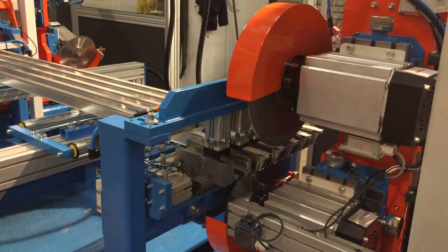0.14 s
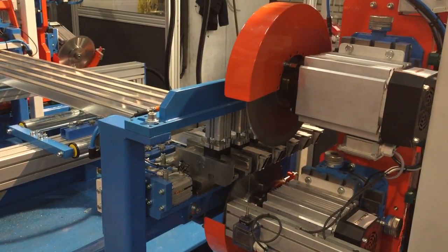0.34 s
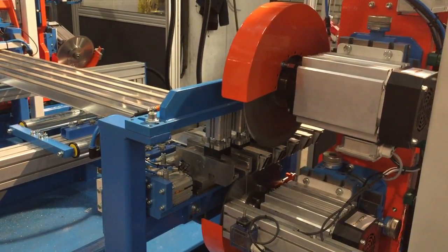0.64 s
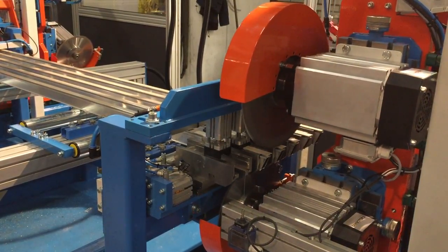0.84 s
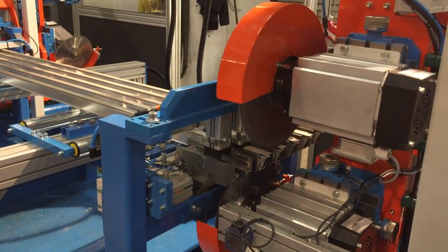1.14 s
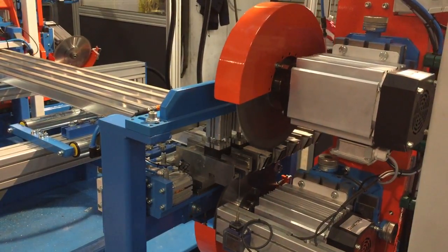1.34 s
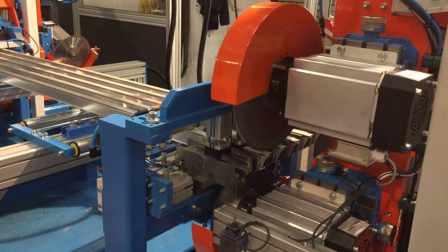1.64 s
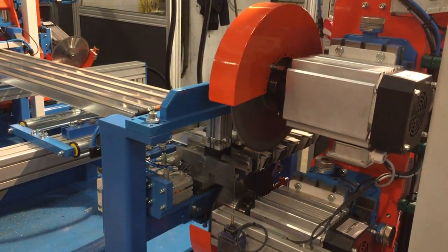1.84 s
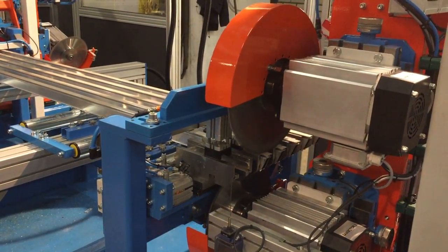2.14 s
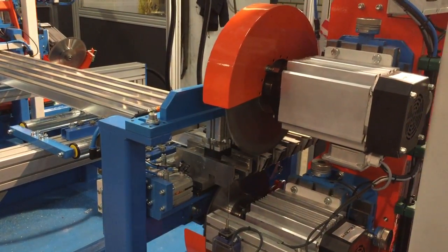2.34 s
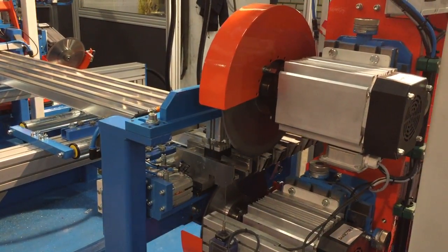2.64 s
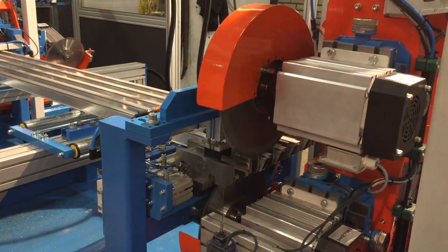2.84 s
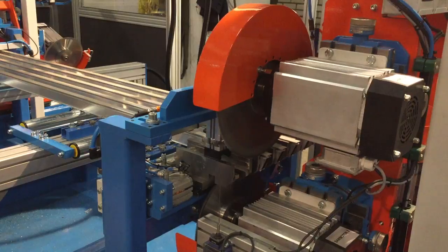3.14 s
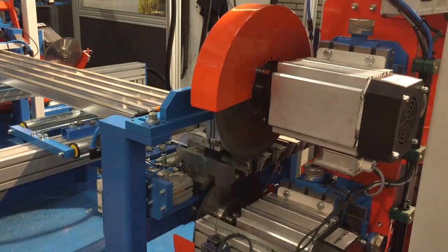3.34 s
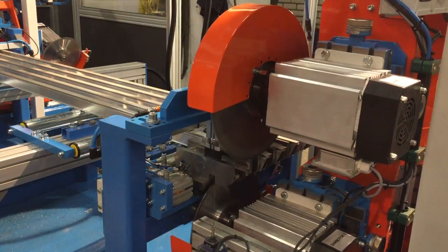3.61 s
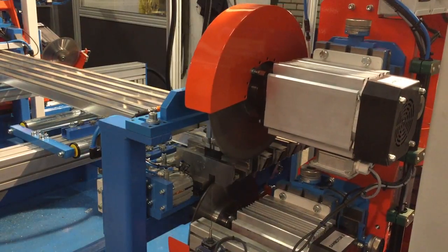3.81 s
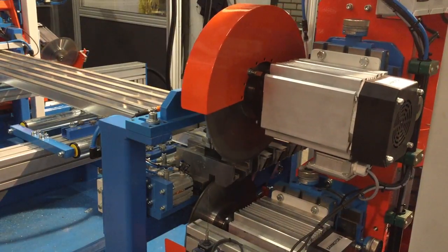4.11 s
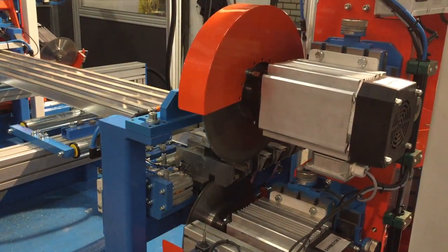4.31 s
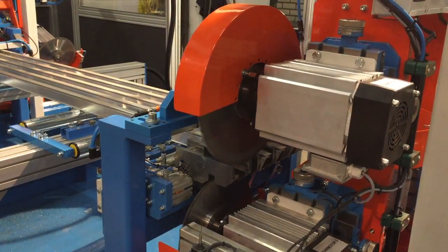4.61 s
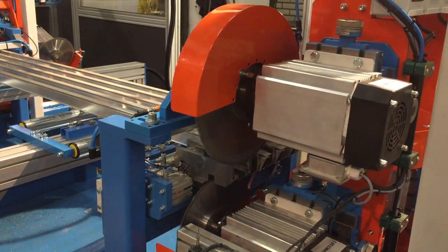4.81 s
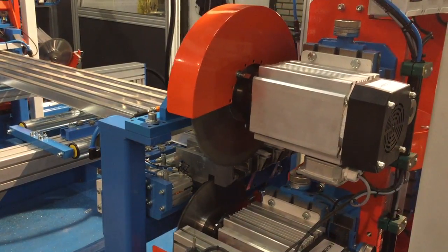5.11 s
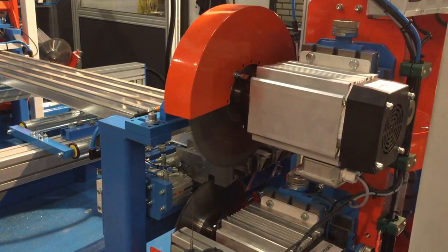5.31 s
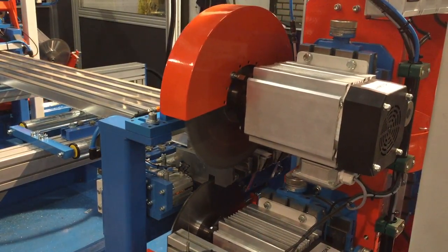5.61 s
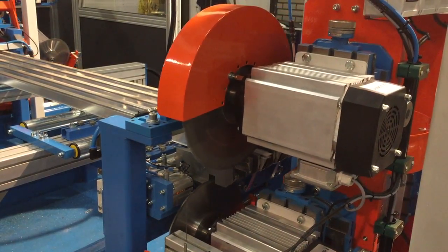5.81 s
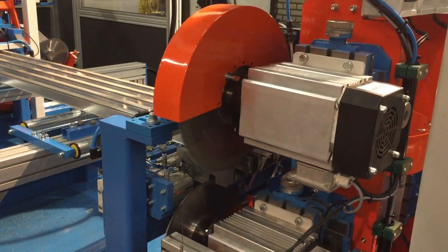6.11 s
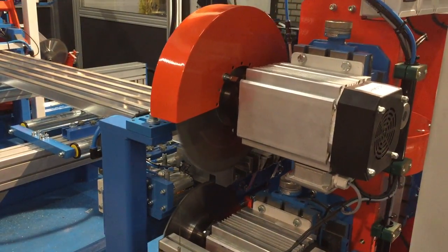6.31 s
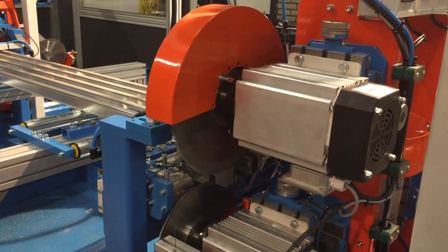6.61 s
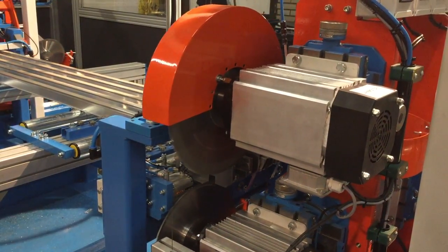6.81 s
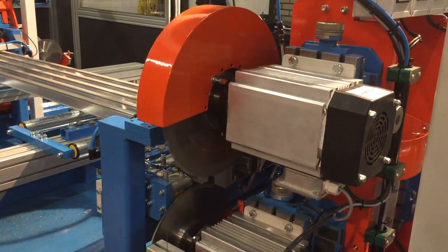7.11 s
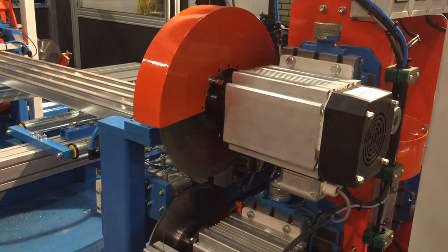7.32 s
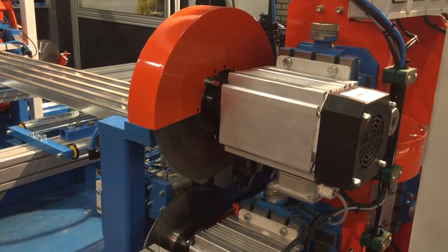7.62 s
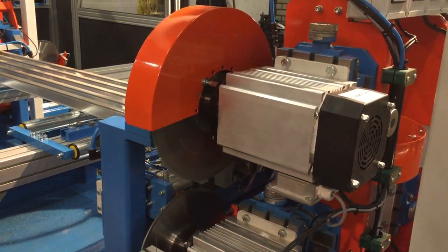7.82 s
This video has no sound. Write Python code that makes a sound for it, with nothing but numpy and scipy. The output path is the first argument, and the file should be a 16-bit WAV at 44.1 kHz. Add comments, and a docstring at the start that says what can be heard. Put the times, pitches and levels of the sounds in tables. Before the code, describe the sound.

From the start, a circular saw rasps harshly through an aluminium profile in a factory, with a high singing tone from its teeth. The blade rings in piercing swells between about 0.4 and 1.7 seconds, with a sharp squeal near 1.2 seconds. The rasp grows again around 2 seconds while the tone weakens into a fluttering buzz. At about 2.9 seconds a second cut begins, with a few small crunches of trapped chips and a thin, building hiss of spray. It rises to a rough, chattering screech around 4 seconds and ends at 4.3. Near 4.5 seconds the loose metal end rattles against the blade in a quick run of ringing strikes. From about 5 to 8 seconds the quieter machine carries on steadily, with rushing air, motor hum, a thin high whine and a low fan drone.

```python
"""A factory: a circular milling saw, 108 teeth at about 50 turns/s, cuts an aluminium profile.
The teeth sing at their passing rate and rasp through the ringing metal, with brief squeals and squeaks.
Thin walls chatter; chips spray and crunch; the loose end rattles against the blade. Underneath,
a fan drones; motor hum and air rush dip under the loud saw and come back up afterwards."""
import sys
import numpy as np
from scipy import signal
from scipy.fft import rfft, irfft, next_fast_len
from scipy.io import wavfile
from scipy.ndimage import map_coordinates

SR = 44100
rng = np.random.default_rng(int(sys.argv[2]) if len(sys.argv) > 2 else 0)


def store_pcm(level_fs):
    """Save levels as 16-bit WAV."""
    pcm = np.round(np.clip(level_fs, -1, 1) * 32767).astype(np.int16)
    wavfile.write(sys.argv[1], SR, np.atleast_2d(pcm).T)


N = 350595
T = np.arange(N) / SR

TEETH, TOP_HZ = 108, 15750
SECOND_CUT_S, ENTRY_S, EXIT_S = 2.93, 0.015, 0.034

# tooth-passing rate, sagging under load (time [s], rate [Hz])
TOOTH_RATE = [(.37, 5388), (.48, 5366), (.68, 5371), (.82, 5360), (1.3, 5367), (1.5, 5380), (1.65, 5378),
              (1.7, 5356), (1.78, 5387), (3.5, 5391)]
# steady tooth tone (time [s], level [dB])
SONG_LEVEL = [(0, -30), (.12, -21.5), (1.9, -19.5), (2.2, -21), (2.6, -26.5), (3.15, -31.5), (4.2, -30.5),
              (4.6, -45)]
# blade ring (time [s], peak [dB], rise [s], fall [s], multiple of tooth rate)
BLADE_SWELLS = [(.435, -8.5, .085, 0.056, 1), (.69, -15, 0.25, .1, 1), (.86, -11, .07, .19, 1),
                (1.04, -22.5, 0.064, .07, 1), (1.234, -15, 0.13, 0.15, 1), (1.55, -19, 0.19, 0.089, 1),
                (1.666, -9.5, 0.15, .048, 1), (.81, -21, .05, 0.073, 2), (1.24, -28, 0.046, 0.041, 2)]
# lines of unequal teeth (multiple of tooth rate, relative level [dB])
UNEVEN_LINES = [(1 / 2, -40), (3 / 4, -36), (3 / 2, -49), (5 / 2, -45)]
# blade in a wall (start [s], end [s], final rasp [dB], final sizzle [dB], growth [dB])
WALL_PASSES = [(0, 0.572, -21.5, -20.5, 4), (.6, 1.877, -30.5, -31, 1), (1.25, 1.263, -37, -27, 0),
               (1.57, 1.654, -32, -35, -3), (1.908, 2.481, -22, -24, 4.5), (2.57, 2.92, -26.5, -31, 6),
               (2.938, 3.005, -25.5, -27, -1), (3.058, 3.157, -22.5, -25, 1), (3.19, 3.55, -21, -21, 6.5),
               (3.59, 4.308, -20.5, -25, -0.5)]

# broad spectra (frequency [Hz], relative density [dB])
FIRST_CUT_COLOUR = [(500, -46), (1000, -10.5), (1400, -8), (2200, 2), (3000, -3), (4200, 1.5), (5000, -4),
                    (6600, -5), (8000, -5.5), (9800, 0), (12500, -7.5), (15500, -4.5)]
SECOND_CUT_COLOUR = [(500, -39), (1000, -17), (1500, 0.5), (2300, 1.5), (3000, -2.5), (4200, 4),
                     (5000, -7.5), (6200, -4), (7500, 0.5), (9500, -2), (12000, -6), (15500, -8)]
AIR_COLOUR = [(25, -43), (50, -15), (140, -9.5), (220, -11.5), (500, -10), (740, -13.5), (1350, -4.5),
              (1950, 1), (3900, -4.5), (5060, -11.5), (6450, -12.5), (9400, -16), (10400, -21),
              (11400, -18), (15700, -21)]
CRUNCH_COLOUR = [(600, -35), (1000, 6), (1600, 1.5), (3200, 10.5), (4500, -18), (9000, 3.5),
                 (15500, -23)]
OFFCUT_COLOUR = [(600, -42), (1400, -2.5), (2500, -5.5), (4200, 2.5), (5600, -2.5), (9000, -9.5),
                 (15500, -13)]
# chip hiss (offset from centre [Hz], relative density [dB])
SPRAY_SIDEBANDS = [(10, -7), (100, 4), (350, -14), (900, -12), (2000, -80)]
# resonances (frequency [Hz], width [Hz], gain over colour [dB])
FIRST_CUT_MODES = [(1460, 55, 14), (1860, 130, 5), (2680, 90, 3), (3580, 62, 7), (3970, 83, 4),
                   (7180, 150, 9), (8820, 120, 10), (14500, 500, 5)]
SECOND_CUT_MODES = [(1478, 30, 13), (1660, 150, 4), (3680, 60, 8), (6720, 100, 3), (7340, 200, 9),
                    (8770, 60, 4), (9035, 50, 12)]
CRUNCH_MODES = [(1634, 64, 22), (2260, 200, 12), (5060, 79, 31), (8800, 120, 15.5)]
OFFCUT_MODES = [(1814, 87, 30.5), (3600, 130, 17.5), (4100, 360, 6.5), (7150, 160, 15.5), (8950, 180, 21.5),
                (13900, 250, 17)]

# background machine noise, dipping under the loud saw, back up afterwards (time [s], level [dB])
BACKGROUND_LEVEL = [(.4, -26), (.55, -29.5), (1.8, -32), (2.5, -30), (3.05, -24), (3.6, -23.5), (4.65, -28),
                    (5.1, -21), (7.95, -21)]
# fan drone (time [s], level [dB])
FAN_LEVEL = [(0, -45), (1.45, -40), (2.5, -47), (3.45, -32), (4.4, -36), (5.65, -34), (6.0, -42),
             (7.95, -40)]
# motor hum and drive whine (frequency [Hz], level re background [dB])
MOTOR_LINES = [(100, -21.5), (244.4, -19.5), (668, -31.5), (898, -30)]
DRIVE_LINES = [(3779, -17.5), (4000, -17), (4221, -20), (4802, -18.5), (8000, -26.5)]

# squeals and faint high sum tones (time [s], peak [dB], rise [s], fall [s], frequency [Hz])
SQUEAL_TONES = [(.15, -28.5, 0.098, .25, 1462), (.54, -26, .015, 0.048, 7190),
                (1.15, -15, 0.077, 0.058, 2342), (1.08, -31, .04, .07, 13080), (1.17, -31, .05, .04, 7720),
                (1.22, -32, .12, 0.028, 3055), (1.6, -26.5, .14, 0.098, 1554), (2.03, -33, .12, 0.11, 1517),
                (1.84, -30.5, 0.027, .03, 1930), (1.86, -29, 0.043, .028, 3470),
                (2.492, -26, 0.053, .025, 1570), (2.98, -22, .025, 0.017, 1488),
                (3.5, -25.5, .2, .17, 9045)]
# chattering walls (time [s], peak [dB], rise [s], fall [s], frequency [Hz])
WALL_CHATTER = [(.41, -22, 0.14, .12, 1882), (2.21, -26.5, .07, 0.18, 1902), (3.95, -19, .11, 0.069, 1987),
                (4.11, -13.5, 0.067, 0.0584, 2044), (4.291, -15, .05, 0.026, 1870)]
# squeaks and the cut's sunken ring (time [s], frequency [Hz], relative level [dB], sigma [s])
SQUEAK_BANDS = [(.44, 3350, -26, .04), (.87, 9800, -39, .09), (1.02, 9450, -35, .02),
                (1.266, 6300, -32, .016), (1.265, 3900, -29, .02), (2.27, 4400, -33, .1),
                (4.07, 6700, -31, .12)]
# brief contacts (time [s], relative level [dB], length [s])
CHIP_CRUNCHES = [(3.078, -20.5, 0.0067), (3.104, -18.5, 0.011), (3.146, -21, 0.0071),
                 (3.257, -25.5, 0.0057)]
OFFCUT_STRIKES = [(4.479, -11, 0.0048), (4.493, -18, 0.0069), (4.522, -10, 0.0074), (4.533, -22, 0.0065),
                  (4.549, -16, 0.016), (4.583, -11.5, 0.0061), (4.6, -20, 0.0082)]


def amp(db):
    """Decibels to gain."""
    return 10 ** (np.asarray(db) / 20)


def unit(x):
    """Scaled to rms 1."""
    return x / np.sqrt(np.mean(x ** 2) + 1e-20)


def curve(rows):
    """(time, value) rows, interpolated per sample."""
    return np.interp(T, *np.transpose(rows))


def wobble(rate_hz):
    """Smooth random curve, knots at rate_hz."""
    return map_coordinates(rng.standard_normal(int(N * rate_hz / SR) + 4), [T * rate_hz])


def phase_of(hz):
    """Phase [rad] of a changing frequency."""
    return 2 * np.pi * np.cumsum(hz) / SR


def held(start_s, end_s, attack_s, release_s):
    """1 from start to end, with Gaussian flanks."""
    before = np.minimum(T - start_s, 0) / attack_s
    after = np.maximum(T - end_s, 0) / release_s
    return np.exp(-before ** 2 - after ** 2)


def swell(peak_s, rise_s, fall_s):
    """Asymmetric bell."""
    return np.exp(-((T - peak_s) / np.where(T < peak_s, rise_s, fall_s)) ** 2 / 2)


def lobe(peak_s, rise_s, fall_s):
    """Slightly pointed arch, zero beyond its ends."""
    u = (T - peak_s) / np.where(T < peak_s, rise_s, fall_s)
    return np.cos(np.pi / 2 * np.clip(u, -1, 1)) ** 1.18


def bursts(rows, ring_s):
    """Contact envelope: fast rise, slower fall, weak dying ring."""
    power = np.zeros(N)
    for at_s, db, length_s in rows:
        t = T - at_s
        contact = np.exp(-(np.where(t < 0, 1.3 * t, t) / length_s) ** 2)
        ring = .06 * (t > 0) * np.exp(-abs(t) / ring_s)
        power += amp(2 * db) * (contact + ring)
    return np.sqrt(power)


def filtered(x, response):
    """x through a frequency response."""
    size = next_fast_len(N + 8192)
    return irfft(rfft(x, size) * response(np.fft.rfftfreq(size, 1 / SR)), size)[:N]


def coloured(x, colour, modes=()):
    """x through a broad spectrum plus resonances, at rms 1."""
    def response(hz):
        knots_hz, db = np.transpose(colour)
        broad = amp(np.interp(np.log(hz + 1), np.log(knots_hz), db, left=-120))
        peaks = sum((amp(gain_db) - 1) * 1j * hz * width_hz
                    / (mode_hz ** 2 - hz ** 2 + 1j * hz * width_hz)
                    for mode_hz, width_hz, gain_db in modes)
        return broad * (1 + peaks)
    return unit(filtered(x, response))


def tooth_song(turn_rad):
    """Tooth-passing tone: flutters once a turn, gives way for a while to the blade's ring."""
    level_db = curve(SONG_LEVEL)
    tooth_rad = TEETH * turn_rad + 0.14 * wobble(130)
    flutter = np.interp(T, [1.8, 2.7], [0.25, 0.45])  # deeper as the blade comes free
    sidebands = np.sin(tooth_rad + turn_rad) + np.sin(tooth_rad + 2 * turn_rad) / 2
    give_way = 1 - 0.98 * held(0.405, 1.685, attack_s=0.04, release_s=0.04)
    tone = amp(level_db) * give_way * (np.sin(tooth_rad) + flutter * sidebands)
    octave_db = -13 + 0.86 * level_db + 3 * wobble(14)
    octave = amp(octave_db) * np.sin(2 * tooth_rad + .5 * wobble(45))
    ring = sum(amp(db) * lobe(at_s, rise_s, fall_s) * np.sin(order * tooth_rad)
               for at_s, db, rise_s, fall_s, order in BLADE_SWELLS)
    uneven = sum(amp(db + 4 * wobble(14)) * np.sin(order * tooth_rad) for order, db in UNEVEN_LINES)
    uneven_gain = amp(-12) + amp(3) * swell(0.79, rise_s=.06, fall_s=0.83)
    return tone + octave + ring + uneven_gain * uneven


def bites(turn_rad, runout_db, chip_db):
    """Each tooth tears a chip of random size; once a turn the blade digs in and eases off."""
    teeth = (1 + .5 * np.cos(TEETH * turn_rad)) * rng.standard_normal(N)
    dig = (np.sin(turn_rad) + np.sin(2 * turn_rad) / 2) * (1 + wobble(30))
    chip_size = unit(wobble(70) + wobble(450))
    return teeth * amp(runout_db * np.minimum(dig, 2) + chip_db * chip_size)


def profile_ring(force, ring_s, gain):
    """The hollow profile's many close modes ring on briefly."""
    t = T[:SR // 8]
    tail = rng.standard_normal(len(t)) * np.exp(-t / ring_s)
    return force + gain * signal.fftconvolve(force, tail / np.linalg.norm(tail))[:N]


def cut(force, passes, colour, modes):
    """Bites ring the profile, wall by wall: the walls rasp, the cutting edge sizzles."""
    metal = coloured(profile_ring(force, ring_s=.016, gain=.75), colour, modes)
    lows = filtered(metal, lambda hz: 1 / (1 + (hz / 5600) ** 8))
    rasp_gain, sizzle_gain = np.zeros(N), np.zeros(N)
    for start_s, end_s, rasp_db, sizzle_db, growth_db in passes:
        growth = amp(np.interp(T, [start_s, end_s], [-growth_db, 0]))
        depth = held(start_s, end_s, ENTRY_S, EXIT_S) * growth
        rasp_gain = np.hypot(rasp_gain, amp(rasp_db) * depth)
        sizzle_gain = np.hypot(sizzle_gain, amp(sizzle_db) * depth)
    return rasp_gain * unit(lows) + sizzle_gain * unit(metal - lows)


def machine(turn_rad):
    """Air rushes round the blade; motors hum, their drive whines, the cooling fan drones."""
    rush = amp(0.4 * wobble(12)) * coloured(rng.standard_normal(N), AIR_COLOUR)
    hum = sum(amp(db + 1.5 * wobble(5)) * np.sin(2 * np.pi * hz * T + .3 * wobble(7))
              for hz, db in MOTOR_LINES + DRIVE_LINES)
    fan = amp(curve(FAN_LEVEL) + 1.3 * wobble(8)) * np.sin(9 * turn_rad)
    return amp(curve(BACKGROUND_LEVEL)) * (rush + hum) + fan


def squeals(pitch_sag=0.011, jitter_hz=9):
    """Brief unsteady squeals, sharper when loud, with faint high sum tones of squeal and tooth tone."""
    out = np.zeros(N)
    for at_s, db, rise_s, fall_s, hz in SQUEAL_TONES:
        effort = swell(at_s, rise_s, fall_s)
        phase = phase_of(hz * (1 - pitch_sag * (1 - effort)) + jitter_hz * wobble(130))
        overtone = amp(-26) * (2 * hz < TOP_HZ) * np.sin(2 * phase)
        out += effort * amp(db + 2.5 * wobble(64)) * (np.sin(phase) + overtone)
    return out


def chatter(pitch_sag=.04, jitter_hz=51.5):
    """Weakened walls screech: a rough tone, sharper when loud, and a rasp just above its octave."""
    out = np.zeros(N)
    for at_s, db, rise_s, fall_s, hz in WALL_CHATTER:
        effort = swell(at_s, rise_s, fall_s)
        phase = phase_of(hz * (1 - pitch_sag * (1 - effort)) + jitter_hz * wobble(380))
        tone = amp(3 * wobble(160)) * np.sin(phase)
        rasp = amp(-2 + 3.4 * wobble(200)) * np.sin(2 * phase + phase_of(110 + 200 * wobble(900)))
        out += effort * amp(db) * (tone + rasp)
    return out


def squeaks(jitter_hz=220):
    """Short, rough narrow-band squeaks; the last band is the second cut's ring, sunk to 6.7 kHz."""
    out = np.zeros(N)
    for at_s, hz, db, sigma_s in SQUEAK_BANDS:
        envelope = amp(db + 6 + 3.14 * wobble(150)) * swell(at_s, sigma_s, sigma_s)
        out += envelope * np.sin(phase_of(hz + jitter_hz * wobble(900)))
    return out


def graze(turn_rad):
    """Between cuts the teeth brush the slot, alike each turn: a buzz near the song and its octave."""
    orders = np.r_[TEETH + 2:TEETH + 7, 2 * TEETH - 7:2 * TEETH + 13]
    buzz = sum(rng.rayleigh() * np.sin(order * turn_rad + rng.uniform(0, 2 * np.pi) + wobble(18))
               for order in orders)
    return np.interp(T, [2.1, 2.8, 3.1], [0, 1, 0]) * amp(-36) * unit(buzz)


def spray(turn_rad, peak_s=3.9, end_s=4.32):
    """Chips fly in the second cut: a thin, pulsing hiss that builds, sinks in pitch and thins out."""
    centre_hz = np.interp(T, [3.45, 4.0], [14480, 14100])
    hiss = coloured(bites(turn_rad, runout_db=2.5, chip_db=0), SPRAY_SIDEBANDS)
    slope_db_per_s = np.where(T < peak_s, 8.5, -34)
    level_db = -17 + slope_db_per_s * (T - peak_s) + 1.6 * wobble(25.04)
    envelope = held(SECOND_CUT_S, end_s, ENTRY_S, EXIT_S) * amp(level_db)
    return envelope * hiss * np.sin(phase_of(centre_hz))


def crunches():
    """Trapped chips crunch in the gullets."""
    chips = coloured(rng.standard_normal(N), CRUNCH_COLOUR, CRUNCH_MODES)
    return amp(4) * bursts(CHIP_CRUNCHES, ring_s=.018) * chips


def rattles():
    """The loose end bounces on the teeth and rings."""
    offcut = coloured(rng.standard_normal(N), OFFCUT_COLOUR, OFFCUT_MODES)
    return bursts(OFFCUT_STRIKES, ring_s=0.025) * offcut


def scene():
    """One spindle, slowed a little by load, times the saw and the fan; all sources sum to mono."""
    turn_rad = phase_of(curve(TOOTH_RATE) / TEETH)
    first_passes = [row for row in WALL_PASSES if row[0] < SECOND_CUT_S]
    second_passes = [row for row in WALL_PASSES if row[0] >= SECOND_CUT_S]
    first_force = bites(turn_rad, runout_db=1.4, chip_db=1.64)
    first_cut = cut(first_force, first_passes, FIRST_CUT_COLOUR, FIRST_CUT_MODES)
    second_force = bites(turn_rad, runout_db=1.5, chip_db=2.0)
    second_cut = cut(second_force, second_passes, SECOND_CUT_COLOUR, SECOND_CUT_MODES)
    saw = tooth_song(turn_rad) + graze(turn_rad) + first_cut + second_cut + spray(turn_rad)
    mono = saw + squeals() + squeaks() + chatter() + rattles() + crunches() + machine(turn_rad)
    return np.array([mono, mono])


def record(dry):
    """Microphone: soft limit on the highest peaks, then a steep band limit."""
    rounded = dry / (1 + np.abs(dry / .75) ** 8) ** (1 / 8)
    return np.array([filtered(side, lambda hz: hz < TOP_HZ) for side in rounded])


dry = scene()
out = record(dry)
store_pcm(out)
```